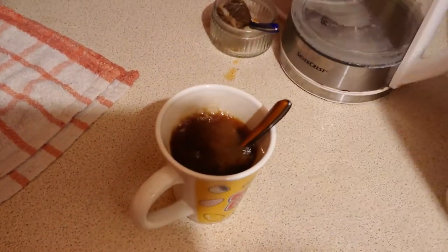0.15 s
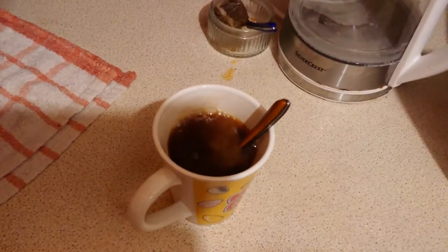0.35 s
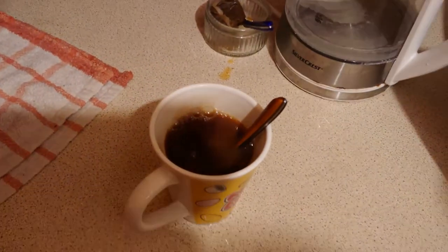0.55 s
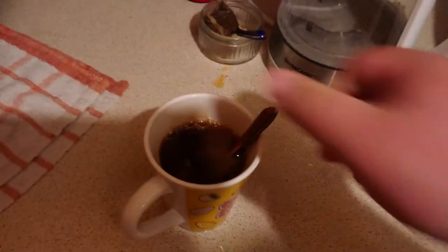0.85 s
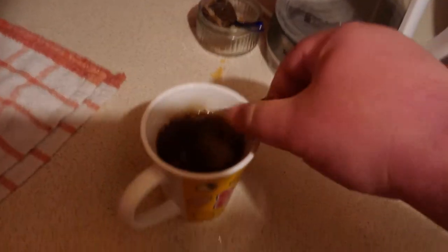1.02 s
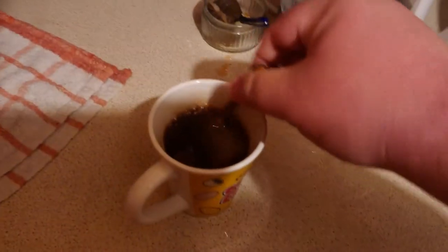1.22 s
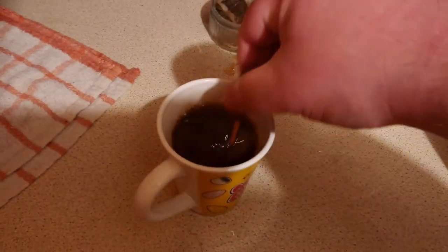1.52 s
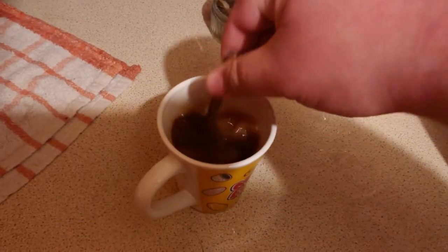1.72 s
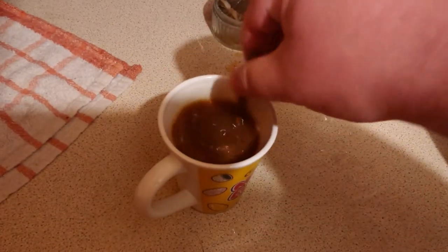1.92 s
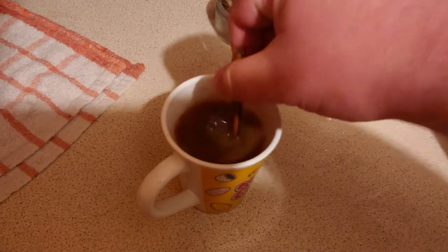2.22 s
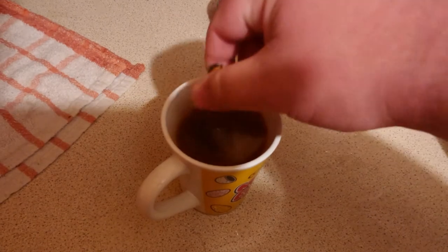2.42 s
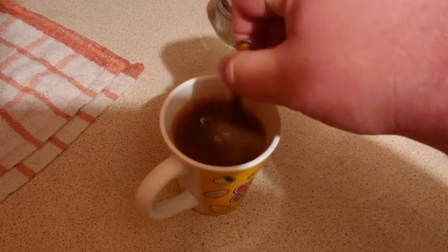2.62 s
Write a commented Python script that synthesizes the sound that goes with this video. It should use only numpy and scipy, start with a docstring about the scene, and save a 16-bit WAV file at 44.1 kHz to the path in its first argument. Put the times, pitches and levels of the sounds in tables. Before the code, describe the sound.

A metal teaspoon stirs a full ceramic mug with irregular bright clinks and faint scraping, after a kettle clatters and thumps onto its base on the counter; small hard kitchen, close stereo microphone, quiet room tone.

```python
"""Over steady room tone a kettle lands on its base on a kitchen counter: rattle, knocks and a cabinet boom.
From about 1.1 s a hand stirs a full ceramic mug with a teaspoon, rocking the mug on the counter.
Spoon knocks crack and ring mug and spoon modes; sliding hisses and feeds the same modes; mug pitch sinks.
Two short rising blips sound in the drink. Counter and mug are resonators; rattle and hiss are shaped noise.
A small hard room adds a noise tail; two microphone ports hear differing levels and arrival times."""
import sys
import numpy as np
from scipy import signal
from scipy.fft import rfft, irfft, next_fast_len
from scipy.io import wavfile
from scipy.ndimage import uniform_filter1d

SR = 44100
rng = np.random.default_rng(int(sys.argv[2]) if len(sys.argv) > 2 else 0)


def generate_wav(signal):
    """Clip the signal to [-1, 1] and save it as 16-bit WAV at the path in sys.argv[1]."""
    frames = np.transpose(np.atleast_2d(signal))
    scaled = np.clip(frames, -1, 1) * 32767
    pcm = np.round(scaled).astype(np.int16)
    wavfile.write(sys.argv[1], SR, pcm)


N = 121275

# room tone spectrum, relative: (frequency [Hz], density [dB per Hz])
HUSH_SPECTRUM = [(18, -55), (30, -3), (60, 1.5), (378, -29), (732, -27), (5440, -29.5), (8090, -41),
                 (14500, -30.5), (16500, -43)]
# left-right likeness of the room tone: (frequency [Hz], correlation [0-1])
HUSH_LIKENESS = [(90, 0.68), (700, 0.043)]
# kettle landing: (time [s], lid and base rattle [dB], counter rub [dB], cabinet boom [dB])
KETTLE_LANDING = [(0, -64.5, -61, -84), (.086, -49.5, -45, -76), (.092, -43.5, -40, -82),
                  (.14, -53, -53, -74), (.2, -76, -79, -72), (.215, -28, -29, -35), (.26, -40, -34, -26),
                  (.365, -50.5, -34.5, -37.5), (.41, -55.5, -42, -27.5), (.45, -44, -41, -33.5),
                  (.458, -30, -25, -41), (.5, -45, -45.5, -43), (.6, -68, -58, -46.5), (.72, -82, -66, -50),
                  (1.08, -85, -72, -70.5)]
# rattle spectrum, relative: (frequency [Hz], density [dB per Hz])
RATTLE_SPECTRUM = [(350, 14), (1000, 4), (5440, 1), (8020, -13), (15200, -13.5), (16500, -45)]
# knocks passed to the counter: (time [s], drive level [dB], main pitch [Hz])
COUNTER_KNOCKS = [(0.014, -31, 445), (0.219, -19, 248), (0.47, -18, 326), (1.087, -22.5, 577),
                  (1.191, -14.5, 380), (1.456, -36.5, 410), (1.83, -36.5, 418), (1.946, -33, 600),
                  (1.694, -36.5, 170), (2.367, -31.5, 170), (2.494, -40, 650), (2.567, -38, 630)]
# counter top modes: (frequency [Hz], gain [dB], t60 [s])
COUNTER_MODES = [(102.5, 8.5, 0.069), (170, -1, 0.13), (253.3, -5.5, 0.21), (317, 0.5, 0.085),
                 (456.4, -5, 0.13), (566, -1, 0.042), (734, -7.5, 0.023), (905, 3.5, 0.016)]
# crackle of each knock, relative: (frequency [Hz], density [dB per Hz])
THUD_SPECTRUM = [(150, -3), (600, 2), (3000, -39)]
# stirring hand: (time [s], spoon sliding on the glaze [dB], mug rocking on the counter [dB])
STIRRING = [(1.08, -65, -46.5), (1.26, -64, -33), (1.42, -57, -50), (1.55, -55, -41), (1.7, -49, -57),
            (1.8, -44.5, -49.5), (1.88, -58, -41), (2.1, -47, -53.5), (2.19, -58, -43), (2.26, -54, -59),
            (2.47, -45.5, -53.5), (2.54, -50.5, -46), (2.61, -49, -64.5), (2.75, -88, -62.5)]
# mug's rocking modes on the counter, relative: (frequency [Hz], gain [dB], t60 [s])
ROCK_MODES = [(171.9, -1.5, 0.067), (377, -1, 0.031)]
# spoon against mug: (time [s], blow level [dB], then drive relative to the blow [dB] of
# mug high, mug low, spoon low, spoon high, mug treble)
SPOON_CLINKS = [(1.0865, -31, -7.5, -53, -12, -1.5, -13.5), (1.2765, -25.5, -15, -24, -23, -44, -6.5),
                (1.4059, -48, -3.5, -45, -50, -36, -5), (1.55, -48, -57, -44, -47, -65, -4),
                (1.6843, -31.5, -11.5, -45, -6, -40, -12), (1.6945, -37, -11, -12, -34, -43, -41),
                (1.9018, -44.5, -21, -55, -13, -55, -6.5), (1.9527, -33.5, -22.5, -32, -44, -46, -66),
                (2.037, -36.5, -48, -12, -14, -6.5, -24), (2.157, -40, -54, -20.5, -13.5, -27, -43),
                (2.3589, -29.5, -11, -23.5, -7.5, -16, -8.5), (2.4764, -43, -13, -40, -9, -45, -7),
                (2.4913, -48, -38, -6, -46, -56, -43), (2.5606, -53.5, -13, -13, -45, -47, 2.5),
                (2.5795, -45.5, -28, -9, -51, -5, -33)]
# mug and spoon mode frequencies before sinking and waver: (frequency [Hz])
RING_MODES_HZ = [2066, 1925, 3098, 7036, 4535, 5190, 5375, 5570, 5850, 6030, 6142, 7540]
# same modes in the same order: (gain [dB], t60 [s])
RING_MODES = [(12, 0.15), (8, 0.27), (5, 0.19), (8, 0.052), (3, 0.19), (2.5, 0.032), (14, 0.045),
              (15.5, 0.095), (17, 0.11), (18, 0.074), (13, 0.22), (4.5, 0.068)]
# mean crack colour, relative: (frequency [Hz], density [dB per Hz])
CRACK_SPECTRUM = [(150, -45), (500, -18), (1500, -20), (3300, -9), (6000, 0), (7000, -14), (11000, -19),
                  (15500, -21)]
# sliding hiss, relative: (frequency [Hz], density [dB per Hz])
SCRAPE_SPECTRUM = [(350, -13.5), (1580, -16), (1950, -10.5), (5080, -13.5), (6000, -4.5), (8600, -23.5),
                   (14600, -21.5), (16500, -65)]
# blips in the drink: (time [s], peak level [dB], starting pitch [Hz])
DRINK_BLIPS = [(1.767, -34.5, 3660), (2.4922, -29, 3620)]
# room decay: (frequency [Hz], t60 [s])
KITCHEN_DECAY = [(100, 0.15), (1000, 0.33), (4000, 0.25), (12000, 0.13)]
# port level difference: (frequency [Hz], left minus right [dB])
PORT_TILT = [(60, -1.5), (950, -1.5), (3770, 9.5), (15000, 7)]

HUSH_RMS_DB = -60
CLUMP_DB, GRIT_PER_S, GRIT_DB = 7.5, 1800, 2.5  # clump depth, contact rate, contact spread
KNOCK_SPREAD_LOG, KNOCK_DB, KNOCK_SPAN_S = 0.43, -35, 0.00575  # spread in natural log of frequency
THUD_DB, THUD_T60_S, THUD_RISE_S = -8, 0.085, 0.0045
BOOM_HZ, BOOM_WIDTH_HZ = 56.56, 6.83
RUB_FROM_ROCK_DB, ROCK_MODES_DB = -8, -5.5
CRACK_DB, CRACK_T60_S, CRACK_RISE_S = 8, 0.04, 0.00074
SPOT_DB = 3  # each knock lands on another spot: spread of treble modes and crack colour
STIR_START_S, SINK_PER_S = 1.09, .027
SINK_SHARE = [1, .6, 0, 0, .08]  # by drive column of SPOON_CLINKS
SCRAPE_RING_DB, SCRAPE_LOW_DB = -45, 1.5  # sliding drives the mug's two low modes harder
SHIMMER = .007  # the sloshing drink makes the treble modes waver by this rms share
BLIP_CYCLES, BLIP_GLIDE = 12, .005
MUG_WET_DB, KETTLE_WET_DB, BASS_WET_DB = -6, -6, -12
KETTLE_LAG_S, MUG_LAG_S = 0.000322, -0.000082  # by which left lags right
MUG_PAN_DB = -0.5  # left minus right
EDGE_HZ = 16500


def amp(db):
    """Decibels to amplitude."""
    return 10 ** (np.asarray(db) / 20)


def evened(x):
    """Scale to unit rms."""
    return x / np.sqrt(np.mean(x ** 2) + 1e-20)


def read(points, hz):
    """Interpolate a table over log frequency."""
    f, value = np.transpose(points)
    return np.interp(np.log(hz + 1), np.log(f + 1), value)


def level(curve, column):
    """Amplitude envelope from a dB column, near silent outside its times."""
    rows = np.transpose(curve)
    return amp(np.interp(np.arange(N) / SR, rows[0], rows[column], left=-120, right=-120))


def add(mix, s, sound):
    """Mix a sound in at s seconds, cut at the end."""
    part = mix[..., round(s * SR):][..., :sound.shape[-1]]
    part += sound[..., :part.shape[-1]]


def coloured(x, spectrum):
    """Filter x by a spectrum, at unit rms."""
    hz = np.fft.rfftfreq(len(x), 1 / SR)
    return evened(irfft(rfft(x) * amp(read(spectrum, hz)), len(x)))


def ring(x, hz, t60_s):
    """One decaying mode driven by x; a click's ring builds up over a fraction of a millisecond."""
    turn = np.exp(2j * np.pi * np.cumsum(hz * np.ones(N)) / SR)
    soft = signal.lfilter([.07], [1, -.93], x / turn)
    decay_per_sample = amp(-60 / (t60_s * SR))
    return (turn * signal.lfilter([1], [1, -decay_per_sample], soft)).real


def grit():
    """Clumped, uneven contacts of two hard surfaces: sparse impulses of random sign."""
    clumps = amp(CLUMP_DB * evened(uniform_filter1d(rng.standard_normal(N), size=500)))
    heights = amp(GRIT_DB * np.minimum(rng.exponential(1, N), 4))
    touching = rng.random(N) < GRIT_PER_S / SR
    return evened(clumps * heights * touching * rng.choice([-1, 1], N))


def hush():
    """Steady shaped noise: room tone and self-noise, most alike in both ports in the bass."""
    a, b = rfft(rng.standard_normal((2, N)))
    hz = np.fft.rfftfreq(N, 1 / SR)
    same = read(HUSH_LIKENESS, hz)
    right = same * a + np.sqrt(1 - same ** 2) * b
    spectra = np.array([a, right]) * amp(read(HUSH_SPECTRUM, hz))
    return amp(HUSH_RMS_DB) * evened(irfft(spectra, N))


def kettle():
    """Plastic and steel rattle densely as the kettle settles on its base: shaped grit and noise."""
    rattle = coloured(grit() + 1.17 * rng.standard_normal(N), RATTLE_SPECTRUM)
    return level(KETTLE_LANDING, column=1) * rattle


def counter_knocks():
    """Soft triple pulses of random sign favour the counter modes near each knock's pitch."""
    out = np.zeros(N)
    jolts = rng.standard_normal((len(COUNTER_KNOCKS), len(COUNTER_MODES), 3))
    for k, (hz, mode_db, t60_s) in enumerate(COUNTER_MODES):
        blows = np.zeros(N)
        for (s, db, pitch_hz), jolt in zip(COUNTER_KNOCKS, jolts):
            near = np.exp(-(np.log(hz / pitch_hz) / KNOCK_SPREAD_LOG) ** 2)
            at = round(s * SR) + np.arange(3) * round(KNOCK_SPAN_S / 2 * SR)
            blows[at] += amp(db + KNOCK_DB) * near * np.sign(jolt[k])
        soft_blows = uniform_filter1d(blows, size=24) * 24
        out += amp(mode_db) * ring(soft_blows, hz, t60_s)
    return out


def thuds():
    """Each counter knock crackles: a decaying burst of shaped noise."""
    out, t = np.zeros(N), np.arange(4096) / SR
    for s, db, _ in COUNTER_KNOCKS:
        envelope = np.minimum(t / THUD_RISE_S, 1) * amp(db + THUD_DB - 60 * t / THUD_T60_S)
        add(out, s, envelope * coloured(rng.standard_normal(len(t)), THUD_SPECTRUM))
    return out


def counter_rub():
    """Rubbing noise from kettle and rocking mug feeds all counter modes."""
    rub = rng.standard_normal(N)
    rubbed = evened(sum(amp(db) * ring(rub, hz, t60_s) for hz, db, t60_s in COUNTER_MODES))
    drive = level(KETTLE_LANDING, column=2) + amp(RUB_FROM_ROCK_DB) * level(STIRRING, column=2)
    return drive * rubbed


def cabinet_boom():
    """The cabinet booms: a low sine with randomly wobbling pitch."""
    wobble = evened(uniform_filter1d(rng.standard_normal(N), size=4000))
    cycles = np.cumsum(BOOM_HZ + BOOM_WIDTH_HZ * wobble) / SR
    return level(KETTLE_LANDING, column=3) * np.sqrt(2) * np.sin(2 * np.pi * cycles)


def rocking():
    """The stirring hand rocks the mug on its foot: grit and noise drive its rocking modes."""
    shake = grit() + rng.standard_normal(N)
    rocked = evened(sum(amp(db) * ring(shake, hz, t60_s) for hz, db, t60_s in ROCK_MODES))
    return amp(ROCK_MODES_DB) * level(STIRRING, column=2) * rocked


def spoon_cracks():
    """Each spoon knock cracks: a decaying noise burst whose colour varies with the spot."""
    out, t = np.zeros(N), np.arange(4096) / SR
    bands_hz = np.geomspace(150, 16000, num=24)
    for s, db, *_ in SPOON_CLINKS:
        colour_db = read(CRACK_SPECTRUM, bands_hz) + SPOT_DB * rng.standard_normal(len(bands_hz))
        noise = coloured(rng.standard_normal(len(t)), np.transpose([bands_hz, colour_db]))
        envelope = np.minimum(t / CRACK_RISE_S, 1) * amp(db + CRACK_DB - 60 * t / CRACK_T60_S)
        add(out, s, envelope * noise)
    return out


def spoon_rings():
    """Knocks and sliding feed the same mug and spoon modes; stirring sinks the mug's pitch."""
    modes = len(RING_MODES)
    drive_column = np.array([0, 1, 2, 2, 3] + [4] * (modes - 5))
    blows = np.zeros((modes, N), complex)
    for s, db, *relative_db in SPOON_CLINKS:
        spot_db = SPOT_DB * rng.standard_normal(modes) * (drive_column == 4)
        phase = np.exp(2j * np.pi * rng.random(modes))
        blows[:, round(s * SR)] = amp(db + np.array(relative_db)[drive_column] + spot_db) * phase
    sink = np.clip(np.arange(N) / SR - STIR_START_S, 0, None) * SINK_PER_S
    slide, out = grit() * level(STIRRING, column=1), np.zeros(N)
    for hz, blow, (db, t60_s), k in zip(RING_MODES_HZ, blows, RING_MODES, drive_column):
        waver = SHIMMER * (k == 4) * evened(uniform_filter1d(rng.standard_normal(N), size=500))
        drive = blow + amp(SCRAPE_RING_DB + SCRAPE_LOW_DB * (k < 2)) * slide
        out += amp(db) * ring(drive, hz * (1 - SINK_SHARE[k] * sink + waver), t60_s)
    return out


def scrape_hiss():
    """The spoon slides on the glaze: shaped grit and noise."""
    hiss = coloured(grit() + 0.54 * rng.standard_normal(N), SCRAPE_SPECTRUM)
    return level(STIRRING, column=1) * hiss


def blips():
    """Short rising tones, like small bubbles, that swell and fade."""
    out = np.zeros(N)
    for s, db, hz in DRINK_BLIPS:
        u = np.arange(0, 3 * BLIP_CYCLES, hz / SR) / BLIP_CYCLES
        envelope = np.e * 2 * u * np.exp(-2 * u)  # peaks at 1
        tone = np.sin(2 * np.pi * BLIP_CYCLES * u * (1 + BLIP_GLIDE * u))
        add(out, s, amp(db) * envelope * tone)
    return out


def kitchen(x):
    """Small hard room: sparse taps of random sign, each band dying at its own speed."""
    taps = np.zeros((2, SR // 2))
    at = np.arange(200, SR // 2 - 20, 20) + rng.integers(0, 20, (2, (SR // 2 - 201) // 20))
    np.put_along_axis(taps, at, rng.choice([-1., 1.], at.shape), 1)
    hz, t, z = signal.stft(taps, SR, nperseg=256)
    decay = amp(-60 * t / read(KITCHEN_DECAY, hz)[:, None])
    tail = signal.istft(z * decay, SR, nperseg=256)[1]
    return signal.fftconvolve(x[None], tail / np.linalg.norm(tail[0]), axes=1)[:, :N]


def ports(x, lag_s, pan_db=0):
    """Direct sound reaches the two ports with a time and level difference."""
    size = next_fast_len(N + 4096)
    hz, side = np.fft.rfftfreq(size, 1 / SR), np.array([[.5], [-.5]])
    delay = np.exp(-2j * np.pi * side * hz * lag_s)
    gain = amp(side * (read(PORT_TILT, hz) + pan_db))
    return irfft(rfft(x, size) * delay * gain, size)[:, :N]


def scene():
    """Mix room tone, kettle and counter, mug and drink, and the room's tail (none on the blips)."""
    rattle = kettle()
    low = counter_knocks() + thuds() + counter_rub() + cabinet_boom() + rocking()
    mug = spoon_cracks() + spoon_rings() + scrape_hiss()
    wet = kitchen(amp(MUG_WET_DB) * mug + amp(KETTLE_WET_DB) * rattle + amp(BASS_WET_DB) * low)
    direct = ports(rattle + low, KETTLE_LAG_S) + ports(mug + blips(), MUG_LAG_S, MUG_PAN_DB)
    return hush() + direct + wet


def record(dry):
    """Band limit: a linear-phase low-pass at EDGE_HZ."""
    lowpass = signal.firwin(255, EDGE_HZ, window=("kaiser", 9), fs=SR)
    return signal.oaconvolve(dry, lowpass[None], "same")


dry = scene()
out = record(dry)
generate_wav(out)
```